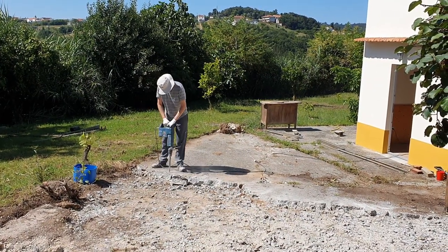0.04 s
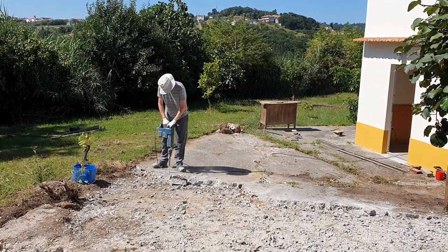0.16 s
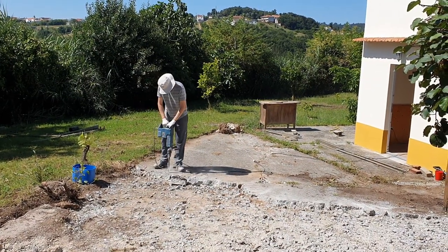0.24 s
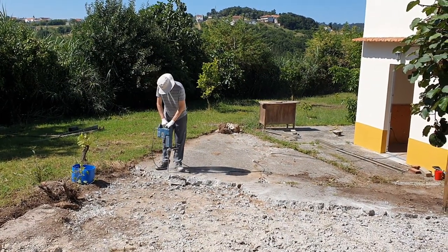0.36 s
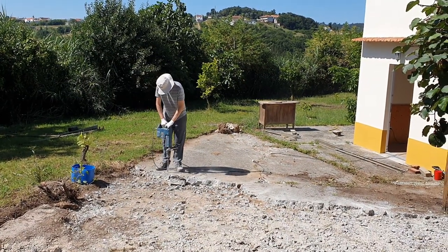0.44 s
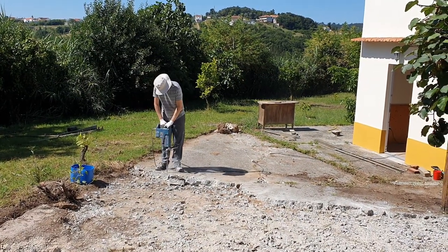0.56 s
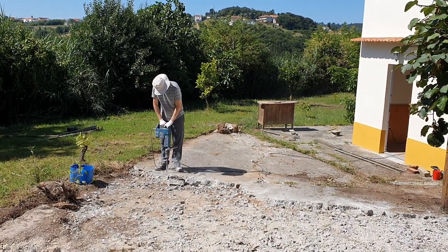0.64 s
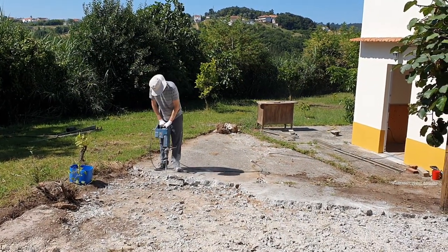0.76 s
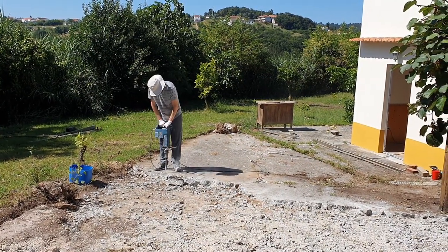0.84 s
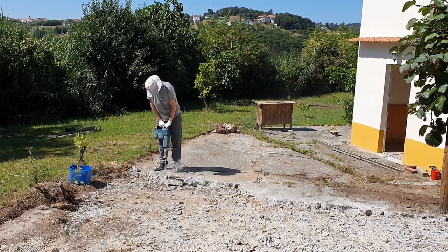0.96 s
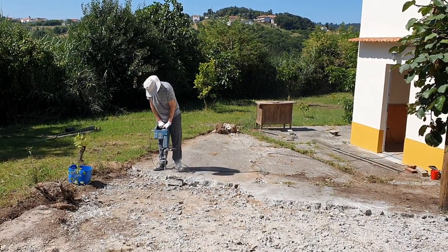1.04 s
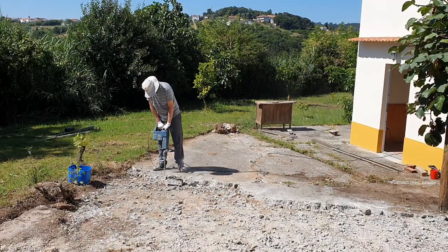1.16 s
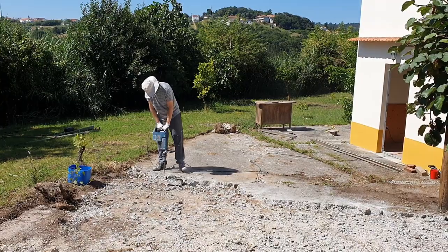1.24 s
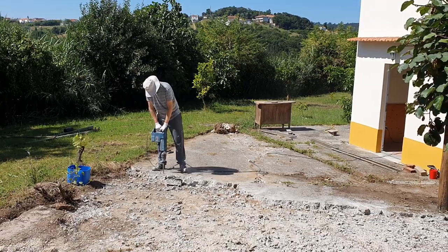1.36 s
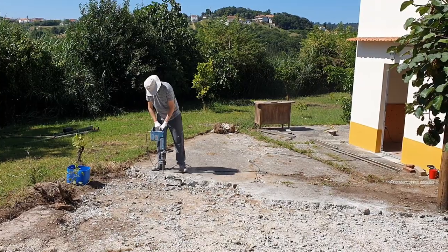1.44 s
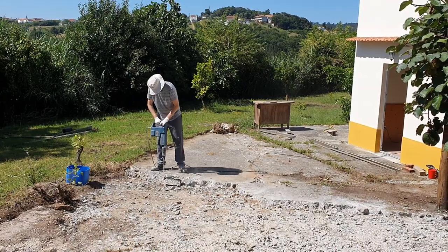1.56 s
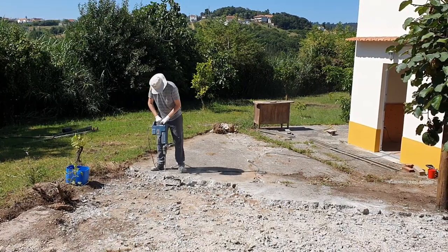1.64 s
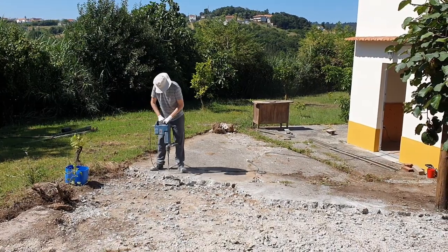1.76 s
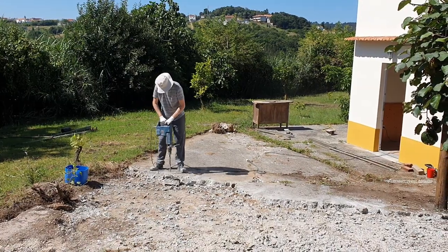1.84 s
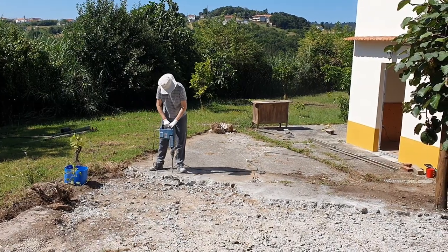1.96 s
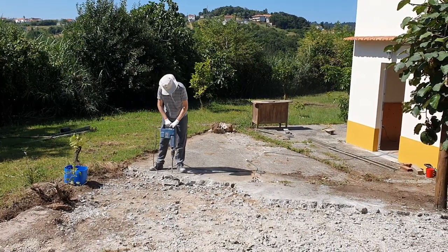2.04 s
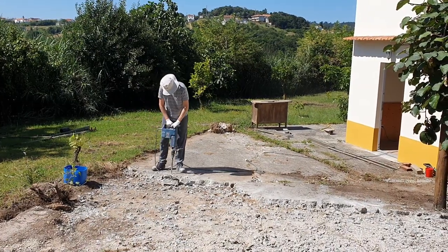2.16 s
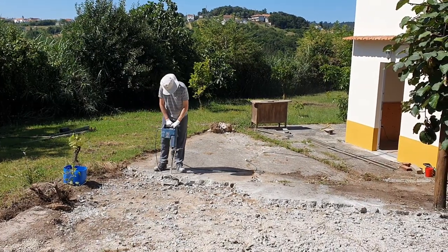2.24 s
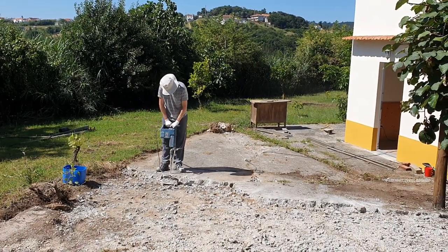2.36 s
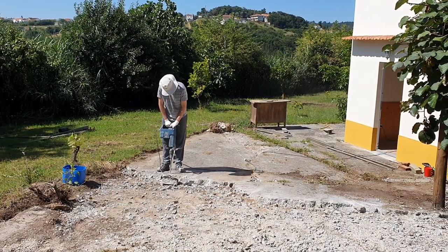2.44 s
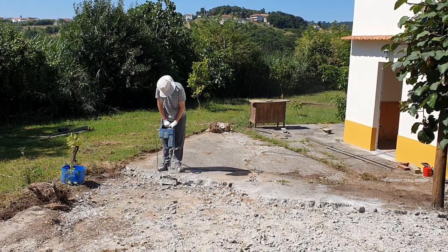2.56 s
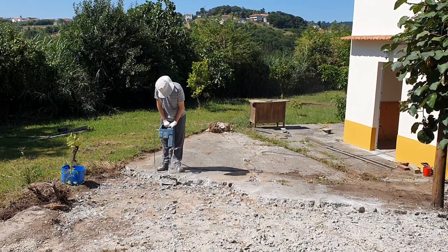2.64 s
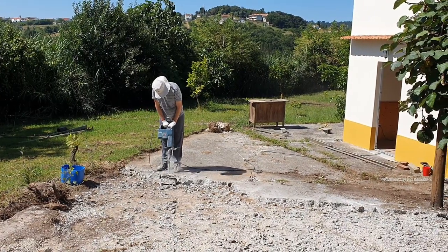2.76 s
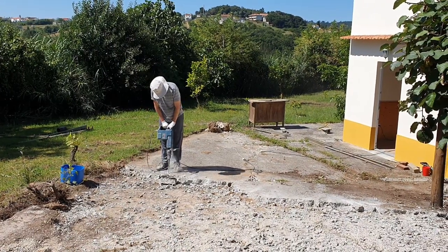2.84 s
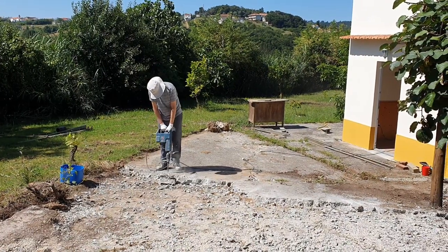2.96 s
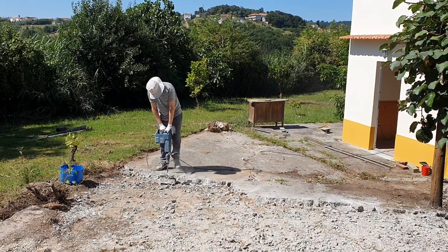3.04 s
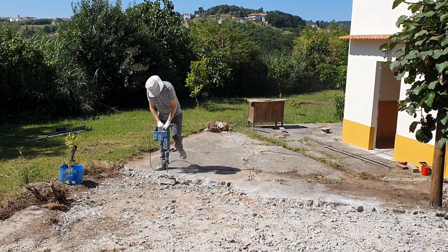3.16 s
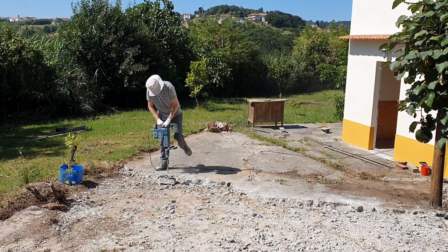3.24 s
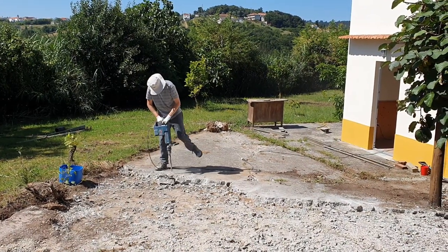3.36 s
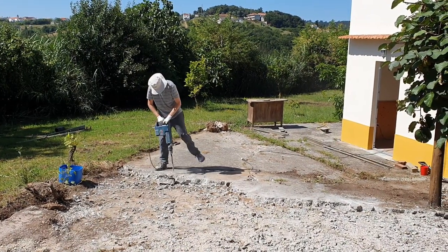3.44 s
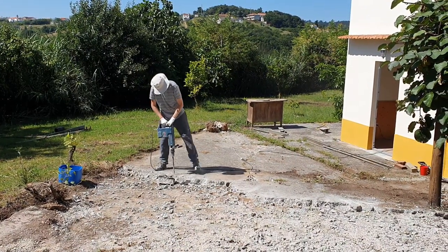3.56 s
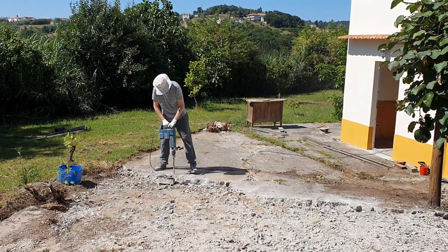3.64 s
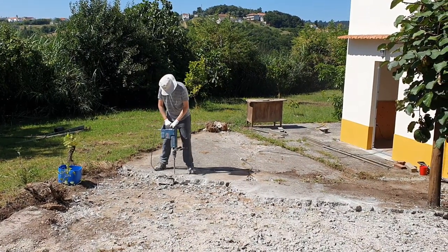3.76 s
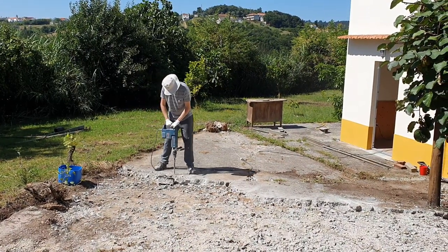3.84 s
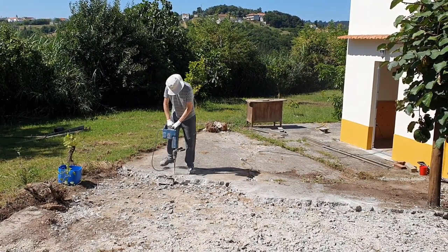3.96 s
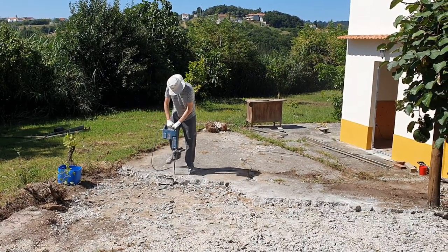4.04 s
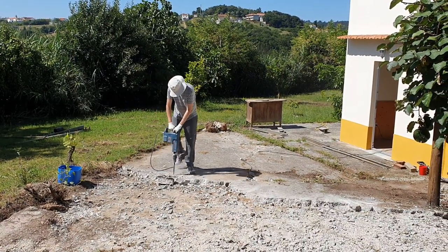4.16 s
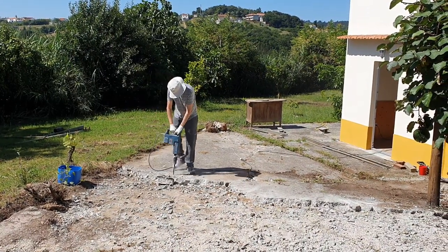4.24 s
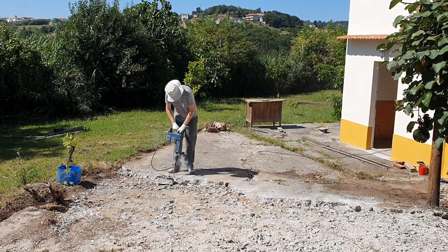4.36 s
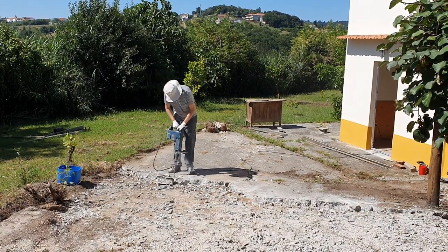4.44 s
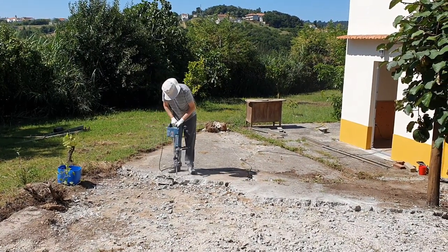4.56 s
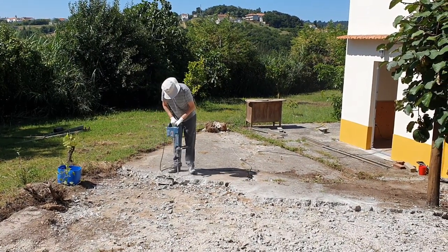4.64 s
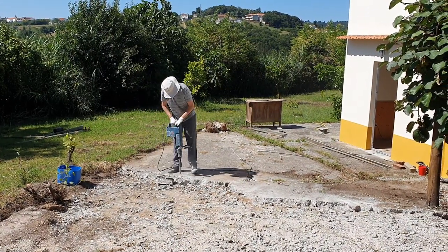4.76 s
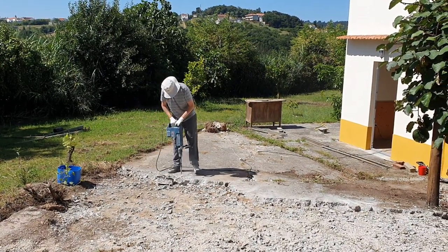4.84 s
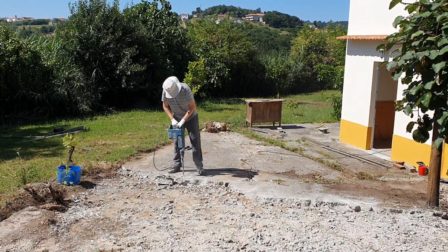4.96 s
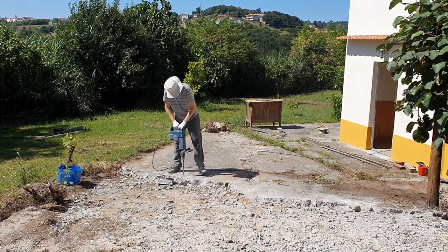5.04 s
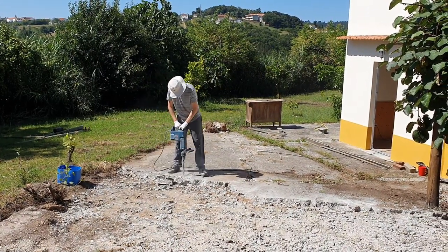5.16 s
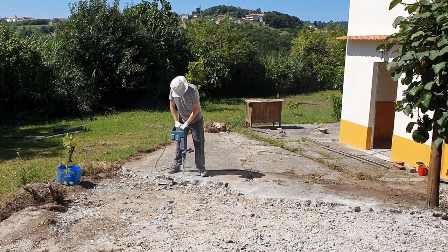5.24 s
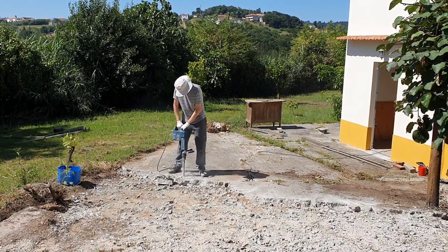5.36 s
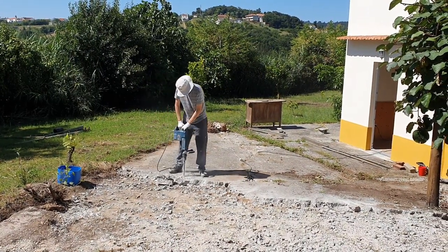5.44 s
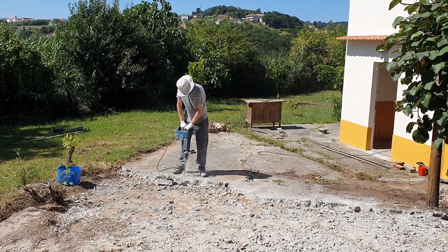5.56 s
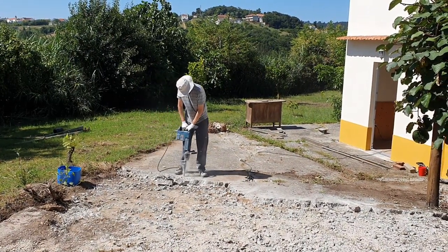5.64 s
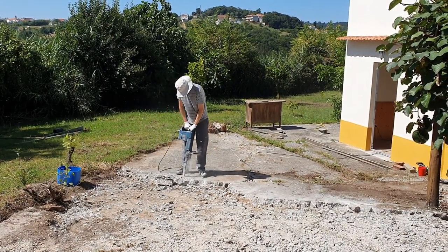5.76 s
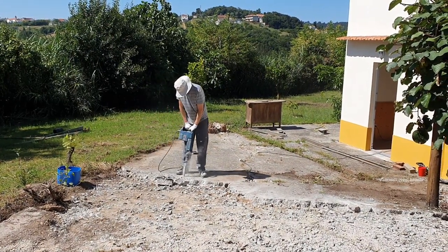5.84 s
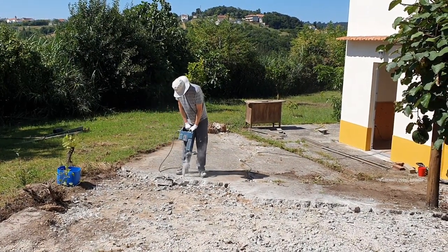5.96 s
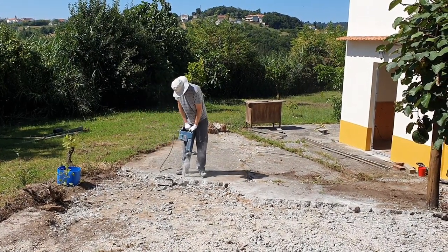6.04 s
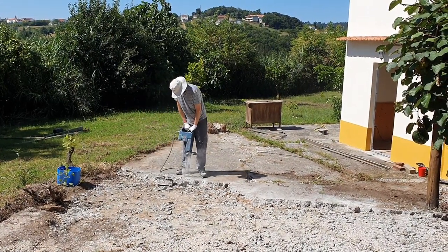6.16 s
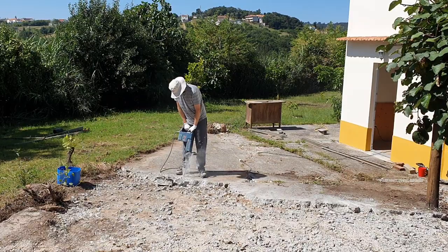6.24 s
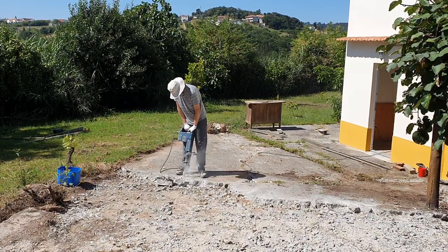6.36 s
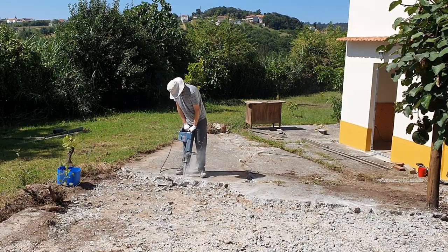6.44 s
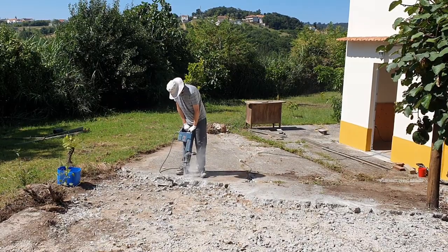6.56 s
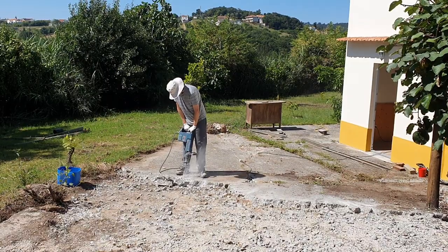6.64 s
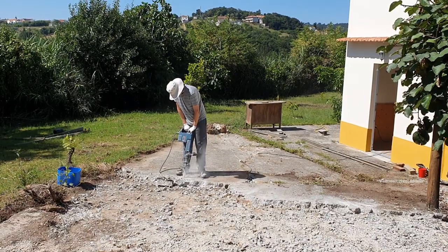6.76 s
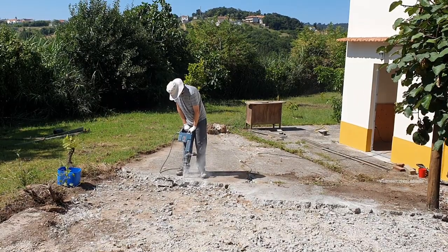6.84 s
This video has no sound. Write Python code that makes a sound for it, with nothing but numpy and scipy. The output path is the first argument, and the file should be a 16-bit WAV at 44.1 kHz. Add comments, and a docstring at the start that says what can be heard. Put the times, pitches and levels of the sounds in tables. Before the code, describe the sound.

Four bursts of fast electric jackhammering break up a concrete slab, with ringing steel, crumbling grit and a motor running in between.

```python
"""Demolition hammer on concrete

An electric hammer chisels an outdoor slab in four bursts at four spots. Each turn of its crank drives
one blow, an impulse that excites the modes of slab, steel chisel and housing and cracks the concrete.
The motor runs throughout, the yard adds a short reverberation, and light wind rumbles in the pauses."""
import sys
import numpy as np
from scipy import signal
from scipy.fft import rfft, irfft, next_fast_len
from scipy.io import wavfile
from scipy.ndimage import uniform_filter1d, map_coordinates

SR = 44100
rng = np.random.default_rng(int(sys.argv[2]) if len(sys.argv) > 2 else 0)


def generate_wav(sig):
    """Save sig (samples, or channels by samples) to the path in sys.argv[1] as 16-bit PCM at SR."""
    pcm = np.round(np.clip(np.atleast_2d(sig).T, -1, 1) * 32767).astype(np.int16)
    wavfile.write(sys.argv[1], SR, pcm)


N = 303849
STROKE_HZ = 31.51

# Bursts of chiselling: start_s, length_s, catch_s, lean_in_s, first_push_db, ease_off_s, last_push_db,
# thud_db, crack_db, clack_db, grit_db, collar_db
BURSTS = [(0.0095, 1.28, 0.0021, 0.53, -4.5, .5, -17, -22.5, -31.5, -34, -33.5, -36.5),
          (1.9762, .91, 0.034, 0.37, -16, 0.37, -11.5, -22, -33, -35.5, -28.5, -34.5),
          (3.7514, .37, 0.0056, .15, -8, .19, -15.5, -23, -33.5, -32, -36, -34),
          (5.0208, 1.9, 0.033, 0.42, -7.5, .05, -1, -25.5, -29.5, -33, -28, -33.5)]
# After each blow come the slab echo, the tool falling back and the piston return: delay_s, gain
RECOILS = [(.0047, 0.26), (.0172, 0.96), (.027, 0.27)]
# Chisel mode rung by the grinding tip: pitch_hz, level_db, t60_s
TIP_MODES = [(5027, 0, 0.068)]
# Spectrum of a hard, dry impact: frequency_hz, density_db
IMPACT_SPECTRUM = [(40, -20), (120, 4), (550, -1), (1200, -2.5), (2200, 2), (3800, 8.5), (6000, -1),
                   (15000, -5.5)]


def hammer(jitter_s=.00006, fall_jitter_s=.0005):
    """Periodic impact: the striker lands once a turn; between blows the tool falls back on its collar."""
    # Spectra of the rasping grit and the collar click: frequency_hz, density_db
    grit_spectrum = [(3000, -37), (6000, 0), (6800, 3), (7900, 2), (9000, -14), (12200, -7), (13100, -2),
                     (16000, -4.5)]
    collar_spectrum = [(2200, -22), (3100, -2.5), (3800, 9), (4500, -2), (6000, -4.5), (10500, -3),
                       (15800, -9)]
    # Ring of the chisel shifting in its hole, one curve per burst: time_s, lower_modes_db, upper_modes_db
    ring_curves = [
        [(0.02, -31.5, -27.5), (0.128, -23.5, -21), (0.23, -30.5, -26.5), (0.9, -32, -31), (1.058, -33, -38),
         (1.226, -25, -32), (1.24, -28.5, -48)],
        [(2.0, -52, -43), (2.074, -31, -31), (2.406, -27, -25), (2.9, -32, -36.5)],
        [(3.77, -30, -28), (3.798, -23, -22.5), (4.12, -27, -28)],
        [(5.1, -27, -31), (5.188, -31.5, -27), (5.634, -28, -33.5), (6.776, -32, -33.5), (6.8, -37, -25)],
    ]
    # Lower and upper modes of the chisel: pitch_hz, level_db, t60_s
    lower_modes = [(7164, -2, 0.038), (7486, 0, 0.066), (9810, -11.5, 0.047)]
    upper_modes = [(12640, -4.5, 0.052), (14050, -1, 0.085), (15560, 1, .05)]
    blows = np.concatenate([strokes(burst) for burst in BURSTS])
    blows += jitter_s * rng.standard_normal(len(blows))
    falls = blows + RECOILS[1][0] + fall_jitter_s * rng.standard_normal(len(blows))
    gains = np.array([layer_gains(burst) for burst in BURSTS])
    _, crack_gain, clack_gain, grit_gain, collar_gain = sum(gains)
    clang_gain, sizzle_gain = sum(ring_gains(burst, curve) for burst, curve in zip(BURSTS, ring_curves))
    thuds = slab(blows, gains[:, 0]) + loose_pieces(blows)
    clang = chisel(blows, lower_modes, scatter_db=5, wet_db=-4)
    clang += amp(2.5) * chisel(falls, lower_modes, scatter_db=4, wet_db=-1.5)
    sizzle = amp(2.5) * chisel(blows, upper_modes, scatter_db=3.2, detune=.004, wet_db=3)
    grind = chisel(np.append(blows, falls), TIP_MODES, scatter_db=6, detune=.006, wet_db=-4)
    grit = grit_gain * rattle(blows, grit_spectrum, t60=.16, rise_t60=.003, scatter_db=4.5)
    collar = collar_gain * (rattle(falls, collar_spectrum, t60=.021, rise_t60=.008, scatter_db=2) + grind)
    # dust around the tip damps the chisel and muffles the crumbling too
    fracture = amp(2.5) * crack_gain ** .62 * sizzle_gain ** .38 * crack(blows)
    clack = amp(2) * clack_gain * housing(blows)
    body = yard(np.array([thuds, thuds]), wet_db=-13)
    return body + fracture + clack + collar + grit + clang_gain * clang + sizzle_gain * sizzle


def push(burst, age):
    """Static load in dB, age seconds into a burst: the worker leans in, holds and eases off."""
    _, length, _, lean, first_db, ease, last_db = burst[:7]
    leaning = np.clip(1 - age / lean, 0, 1)
    easing = np.clip(1 + (age - length) / ease, 0, 1)
    return first_db * leaning ** 2 + last_db * easing ** 1.05


def strokes(burst, run_on_s=.11, lag_s_per_db=.00025):
    """Travel time of the striker: a lightly pushed chisel sits lower, so its blows come later."""
    start, length = burst[:2]
    age = np.arange(0, length + run_on_s, 1 / STROKE_HZ)
    return start + age - lag_s_per_db * push(burst, age)


def layer_gains(burst, weak_start_db=-5):
    """Contact coupling: each layer follows the push and the sinking tip, and dies as the tool lifts."""
    # Response of thud, crack, clack, grit and collar: db_per_push_db, drift_db_per_s, release_db_per_s
    coupling = [(1, 0.52, 266), (0.5, 1.3, 140), (0.8, 3.5, 139), (0.8, -1, 166), (0.35, 0.3, 150)]
    start, length, catch = burst[:3]
    age = np.arange(N) / SR - start
    force_db = push(burst, age)
    catch_db = weak_start_db * np.clip(1 - age / catch, 0, 1)  # until the striker catches
    sunk, lifted = np.clip(age, 0, length), np.maximum(age - length, 0)
    return np.array([(age >= 0) * amp(db + catch_db + share * force_db + drift * sunk - release * lifted)
                     for db, (share, drift, release) in zip(burst[7:], coupling)])


def slab(blows, gains):
    """Modal response depends on the driving point: each burst thuds with the modes of its own spot."""
    # Modes of slab and housing at each spot: pitch_hz, bandwidth_hz, level_db
    spot_1 = [(78.6, 15, -4.5), (150, 77, -6.5), (186.8, 39, -13), (253, 42, -14.5), (338, 49, -14),
              (413, 42, -15.5), (548, 81, -14.5), (653, 33, -15), (784, 130, -22.5), (1160, 63, -22.5),
              (1694, 100, -21.5)]
    spot_2 = [(64, 27, -17), (104, 18, -4.5), (149.6, 35, -7), (292, 66, -17.5), (460, 55, -14.5),
              (546, 63, -10), (670, 60, -19), (880, 54, -15), (1110, 100, -23)]
    spot_3 = [(67.4, 24, -12.5), (114, 34, -3), (175, 74, -10.5), (392, 80, -16.5), (569, 55, -3.5),
              (890, 140, -17.5), (1160, 100, -21)]
    spot_4 = [(91, 14, -6.5), (139, 17.8, -5), (190.4, 7.6, -18), (260, 36, -25.5), (373.5, 49, -13.5),
              (477, 72, -16), (564, 68, -21.5), (643, 28, -11.5), (696, 27, -15.5), (1176, 74, -22.5),
              (1590, 88, -27), (2000, 87, -23)]
    return sum(gain * thud(blows, spot) for gain, spot in zip(gains, (spot_1, spot_2, spot_3, spot_4)))


def thud(blows, spot, low_hz=45, heavy_hz=480, soft_hz=2600, bend_hz=200, bend_delay_s=.00312):
    """Forced vibration: three low modes sway with blows and recoil; the higher ones knock roughly."""
    def sway(f):
        modes = sum((-1) ** (k + 1) * amp(db) * resonance(f, hz, width)
                    for k, (hz, width, db) in enumerate(spot[:3]))
        recoil = 1 + sum(gain * np.exp(-2j * np.pi * f * delay) for delay, gain in RECOILS)
        # dispersion: low bending waves cross the slab slowly, arriving bend_delay_s late at bend_hz
        bending = np.exp(-2j * np.pi * bend_delay_s * 2 * bend_hz * np.log1p(f / bend_hz))
        return modes * recoil * bending / (1 + (low_hz / (f + 1)) ** 6) / (1 + (f / heavy_hz) ** 4)

    def knock(f):
        modes = sum((-1) ** ((k + 1) // 2) * amp(db) * resonance(f, hz, width)
                    for k, (hz, width, db) in enumerate(spot[3:]))
        return modes / (1 + 1j * f / soft_hz)

    hits = unit(uneven_pulses(blows, scatter_db=1.3))
    return unit(filtered(hits, sway) + amp(.7) * filtered(contact(blows), knock))


def contact(blows, rubble_db=-7, rubble_t60=.23, knock_hz=750, jitter_s=.0003):
    """Contact force on the concrete: a sharp impulse, duller knocks after it, and grinding rubble."""
    count = len(blows)
    hits = uneven_pulses(blows, scatter_db=.5)
    knocks = sum(pulses(blows + delay + jitter_s * rng.standard_normal(count), np.full(count, gain))
                 for delay, gain in RECOILS)
    knocks = filtered(knocks, lambda hz: 1 / (1 + (hz / knock_hz) ** 4))
    rubble = rng.standard_normal(N) * fade(hits, rubble_t60)
    return unit(amp(rubble_db) * unit(rubble) - unit(hits + knocks))


def chisel(times, modes, wet_db, **variation):
    """Repeated excitation: the chisel's ring and its reverberation, held at an even level."""
    return steady(yard(steel(times, 1, modes, **variation), wet_db))


def steel(times, sizes, modes, scatter_db, detune=.00387, stereo_rad=.57, samples=6000):
    """Damped free vibration: the changing contact varies each mode's strength, pitch and decay."""
    t = np.arange(samples) / SR
    where = (np.round(np.abs(times) * SR).astype(int)[:, None] + np.arange(samples)).ravel()
    out = np.zeros((2, N))
    for hz, db, t60 in modes:
        strength, tuning, damping, phase, ears = rng.standard_normal((len(times), 5)).T[..., None]
        loss_db = 60 * t / t60 * np.exp(.3 * damping)
        decay = amp(db + scatter_db * strength - loss_db) * np.reshape(sizes, (-1, 1))
        angle = 2 * np.pi * (hz * (1 + detune * tuning) * t + phase)
        for ear, sign in enumerate((1, -1)):
            ring = decay * np.sin(angle + sign * stereo_rad * ears)
            out[ear] += np.bincount(where, ring.ravel(), N)[:N]
    return out


def ring_gains(burst, curve, release_db_per_s=185):
    """Envelopes of the chisel's lower and upper modes, decaying exponentially once the tool lifts."""
    t = np.arange(N) / SR
    times, *levels = np.transpose(curve)
    release_db = release_db_per_s * np.maximum(t - times[-1], 0)
    return np.array([(t >= burst[0]) * amp(np.interp(t, times, db) - release_db) for db in levels])


def crack(blows, rise_t60=.0047, snap_t60=.012, crumble_t60=.3, crumble_db=-10, grains_per_s=1400):
    """Brittle fracture: concrete snaps under the tip and crumbles on in separate grains."""
    # Spectrum of breaking concrete: frequency_hz, density_db
    spectrum = [(30, -28), (150, 6), (600, 5.5), (2000, -4.5), (3600, 1), (8000, 2), (11500, -4),
                (15800, -8)]
    hits = uneven_pulses(blows, scatter_db=2.8)
    grains = (rng.random(N) < grains_per_s / SR) * rng.exponential(size=N)
    crumble = amp(crumble_db) * unit(fade(grains, t60=.0056)) * fade(hits, crumble_t60)
    split = fade(fade(hits, snap_t60), rise_t60)
    return unit(noise(spectrum) * (split / split.max() + crumble))


def housing(blows, t60=.029, samples=1400, clatter_gain=1.9):
    """High modal density: the housing answers each blow with one noise-like clack plus fresh clatter."""
    # frequency_hz, density_db
    spectrum = [(350, -33), (780, -4), (1100, -2), (1380, -7), (1850, 1.5), (2600, -3.5), (3700, -2.5),
                (7000, -43), (15000, -13)]
    hits = uneven_pulses(blows, scatter_db=1)
    response = noise(spectrum)[:, :samples] * amp(-60 * np.arange(samples) / SR / t60)
    clack = signal.fftconvolve(hits[None], response, axes=1)[:, :N]
    clatter = impact(hits, spectrum, t60, tail_db=-18, tail_t60=.13)
    return unit(yard(clack + clatter_gain * clatter, wet_db=-6))


def rattle(times, spectrum, t60, rise_t60, scatter_db):
    """Friction noise: a short rasp of steel on steel at each time."""
    hits = uneven_pulses(times, scatter_db)
    return unit(noise(spectrum) * fade(fade(hits, t60), rise_t60))


def loose_pieces(blows):
    """Resonance: a piece that has cracked free rings at its own pitch for a few blows."""
    # Loosened pieces of slab: middle_s, half_length_s, pitch_hz, bandwidth_hz, level_db
    pieces = [(.81, 0.074, 1660, 45, -32.5), (2.306, .12, 555, 40, -36), (3.925, 0.12, 570, 40, -32)]
    t = np.arange(N) / SR
    out = np.zeros(N)
    for middle, half, hz, width, db in pieces:
        ring = steady(filtered(contact(blows), lambda f: resonance(f, hz, width)))
        out += amp(db) * np.exp(-((t - middle) / half) ** 2) * ring
    return out


def chips():
    """Sudden release of strain: stone splits off with a hard, dry crack."""
    # Stone splitting off: start_s, level_db
    splits = [(.171, -17), (2.23, -17), (4.071, -15), (4.197, -8.5)]
    times, db = np.transpose(splits)
    cracks = impact(pulses(times, amp(db)), IMPACT_SPECTRUM, t60=.021, tail_db=-12, tail_t60=.15)
    return yard(cracks, wet_db=-12)


def tip_pings():
    """Hard contact excites a high mode: the chisel pings as its tip meets a pebble."""
    # Strikes on pebbles: start_s, level_db
    pebbles = [(5.668, -19), (5.753, -16), (6.1, -18)]
    times, db = np.transpose(pebbles)
    return yard(steel(times, amp(db), TIP_MODES, scatter_db=.5), wet_db=-6)


def stray_blows():
    """Free vibration: single blows catch the unloaded chisel, which clacks and rings."""
    # Blows on the loose chisel: start_s, level_db, ring_offset_db
    blows = [(1.187, -34, 20), (1.218, -36, 17), (1.239, -32, 22), (1.315, -26, 3), (2.967, -29, 8),
             (3.03, -31, -3), (3.628, -24.5, 8), (3.658, -28, 12), (4.165, -19, 6), (4.254, -22.5, 4),
             (4.279, -26, 12), (4.969, -31, 4), (5.053, -23, 11)]
    # Modes of the chisel hanging free: pitch_hz, level_db, t60_s
    free_modes = [(7350, 2, 0.032), (15560, -7, .03)]
    times, db, ring_db = np.transpose(blows)
    clack = impact(pulses(times, amp(db)), IMPACT_SPECTRUM, t60=.03, tail_db=-14, tail_t60=.34)
    ring = steel(times, amp(db + ring_db), free_modes, scatter_db=1)
    return yard(amp(1.5) * clack, wet_db=-4) + yard(amp(-2.5) * ring, wet_db=-4.5)


def striker(turns, idle_db=-45):
    """Impacts in the barrel: the striker rattles twice a turn and pings as the chisel engages or drops."""
    # Modes of the barrel: pitch_hz, level_db, t60_s
    barrel_modes = [(1900, 8, 0.047), (1977, 8.5, 0.049), (3850, 4, .06)]
    ping_modes = [(1950, 0, .03), (3940, 9, .03)]
    # Runs of one ping a turn: start_s, length_s, level_db
    runs = [(1.935, .175, -21.5), (2.89, .14, -21.5)]
    beats = np.flatnonzero(np.diff(np.floor(2 * turns))) / SR
    times, db = np.transpose([(start + age, level) for start, length, level in runs
                              for age in np.arange(0, length, 1 / STROKE_HZ)])
    idle = steel(beats, amp(idle_db), barrel_modes, scatter_db=3.5, stereo_rad=.39)
    pings = steel(times, amp(db), ping_modes, scatter_db=.5, stereo_rad=.2)
    # the housing passes the ring without its click
    pings = filtered(pings, lambda hz: 1 / (1 + 1j * (hz - 1950) / 300))
    return yard(idle + pings, wet_db=-13.5)


def slab_bumps():
    """Low-frequency impact: between bursts the chisel bumps the slab, set down or driven by a brief blow."""
    # Dull bumps on the slab: start_s, level_db
    bumps = [(1.89, -38), (3.56, -37), (3.625, -23.5), (4.965, -38)]
    # Spectrum of the bump: frequency_hz, density_db
    spectrum = [(40, -22), (140, 2), (600, -15), (4000, -52)]
    times, db = np.transpose(bumps)
    return noise(spectrum) * fade(pulses(times, amp(db)), t60=.21)


def motor(turns, throb_db=1, whine_cycles_per_turn=146.4):
    """Amplitude modulation: fan air throbs with the crank, and the blades add a thin whine."""
    # Spectrum of the fan air: frequency_hz, density_db
    spectrum = [(88, -55), (150, -22), (504, -10.5), (545, -5), (1200, -10.5), (2900, -9.5), (3800, -5.5),
                (4600, -6), (5150, -12.5), (7300, -17), (16000, -34)]
    air = noise(spectrum) * amp(throb_db * np.cos(2 * np.pi * turns) + 1.7 * wobble(8))
    whine = amp(-55 + 2 * wobble(12)) * np.sin(2 * np.pi * whine_cycles_per_turn * turns + wobble(60))
    return amp(-36) * air + whine


def wind():
    """Turbulence: light wind rumbles in small gusts under everything."""
    # Spectrum of the rumble: frequency_hz, density_db
    spectrum = [(20, -38), (45, -17), (72, -6.5), (130, -19.5), (300, -39)]
    gusts = amp(2 * wobble(12))
    return amp(-49.5) * noise(spectrum) * gusts


def yard(x, wet_db):
    """Reverberation: wall, hedge and rubble scatter a short tail."""
    # Reverberation time of the yard: frequency_hz, t60_s
    decay_times = [(100, 0.05), (1000, 0.53), (7000, 0.16), (15000, 0.092)]
    hz, t, spectra = signal.stft(rng.standard_normal((2, SR // 3)), SR, nperseg=256)
    decay = amp(-60 * t / along(decay_times, hz)[:, None])
    tail = signal.istft(spectra * decay, SR, nperseg=256)[1]
    return x + amp(wet_db) * signal.fftconvolve(x, tail / np.linalg.norm(tail[0]), axes=1)[:, :N]


def noise(spectrum):
    """Partial coherence: coloured stereo noise of rms 1, alike in the bass and apart in the treble."""
    # Likeness of the two channels: frequency_hz, correlation
    coherence = [(400, 1), (1000, 0.65), (2500, 0.82), (4500, .5), (13000, 0.19)]

    def colour(hz):
        angle = np.arccos(np.clip(along(coherence, hz), -1, 1)) / 2
        return amp(along(spectrum, hz)) * [np.cos(angle), np.sin(angle)]

    mid, side = filtered(rng.standard_normal((2, N)), colour)
    return unit(np.array([mid + side, mid - side]))


def impact(hits, spectrum, t60, tail_db, tail_t60):
    """Double-slope decay: each hit starts a short burst of noise and a weaker, longer tail."""
    return noise(spectrum) * (fade(hits, t60) + amp(tail_db) * fade(hits, tail_t60))


def resonance(f, hz, width):
    """Frequency response of one damped mode, gain 1 at its centre."""
    return 1j * f * width / (hz * hz - f * f + 1j * f * width)


def pulses(times, sizes):
    """Impulse train: one impulse at each time."""
    return np.bincount(np.clip(np.round(times * SR).astype(int), 0, N), sizes, N + 1)[:N]


def uneven_pulses(times, scatter_db):
    """Impulse train with log-normal strengths."""
    return pulses(times, amp(scatter_db * rng.standard_normal(len(times))))


def fade(x, t60):
    """Exponential decay: each impulse of x falls 60 dB in t60 seconds."""
    pole = amp(-60 / (t60 * SR))
    return signal.lfilter([1], [1, -pole], x)


def steady(x):
    """Compression: the level of x is evened out over about three strokes."""
    power = np.mean(np.atleast_2d(x) ** 2, axis=0)
    smooth = np.abs(uniform_filter1d(uniform_filter1d(power, size=2800), size=2800))
    return x / np.sqrt(smooth + power.mean() / 100)


def filtered(x, response):
    """Linear filtering: the spectrum of x times a complex response."""
    size = next_fast_len(N + SR // 4)
    return irfft(rfft(x, size) * response(np.fft.rfftfreq(size, 1 / SR)), size)[..., :N]


def wobble(rate):
    """Smooth random modulation, rate knots a second."""
    return map_coordinates(rng.standard_normal(int(N * rate / SR) + 4), [np.arange(N) * rate / SR])


def along(points, hz):
    """Interpolation of (frequency_hz, value) points on a log frequency axis."""
    frequencies, values = np.transpose(points)
    return np.interp(np.log(hz + 1), np.log(frequencies + 1), values)


def amp(db):
    """Decibels to amplitude gain."""
    return 10 ** (np.asarray(db) / 20)


def unit(x):
    """Normalisation to rms 1."""
    return x / np.sqrt(np.mean(x ** 2) + 1e-20)


def scene(left_lead_s=.00008):
    """Interaural time and level cues: the tool stands to the left, where it sounds first and brighter."""
    # Balance between the ears: frequency_hz, left_minus_right_db
    balance = [(120, -3.5), (500, -2.3), (1000, -0.5), (7000, 0), (13000, 5)]
    turns = STROKE_HZ * np.arange(N) / SR
    sound = hammer() + slab_bumps() + stray_blows() + chips() + tip_pings()
    sound += striker(turns) + motor(turns) + wind()
    ear = np.array([[.5], [-.5]])
    advance_s = ear * left_lead_s
    return filtered(sound, lambda hz: amp(ear * along(balance, hz)) * np.exp(2j * np.pi * hz * advance_s))


def record(dry, top_hz=15850):
    """Band limiting: nothing above top_hz is heard."""
    return filtered(dry, lambda hz: hz < top_hz)


dry = scene()
out = record(dry)
generate_wav(out)
```